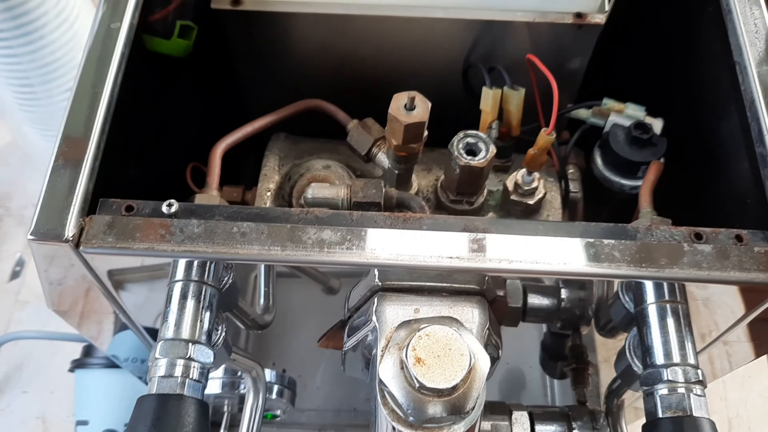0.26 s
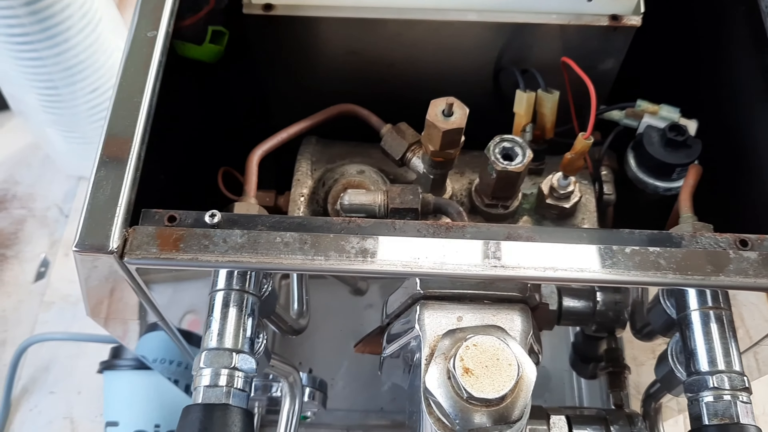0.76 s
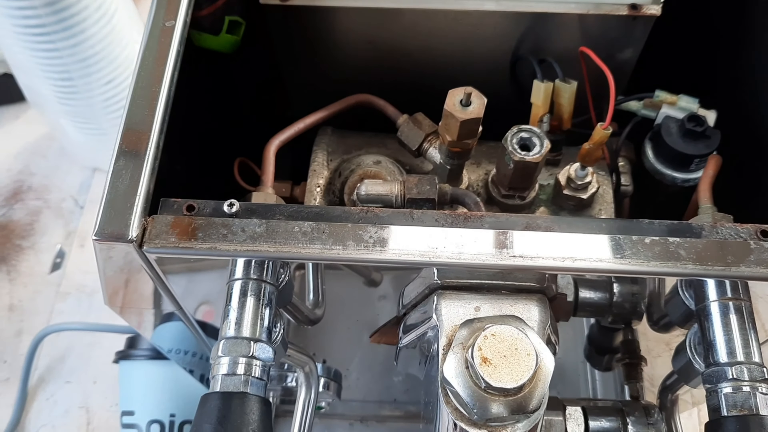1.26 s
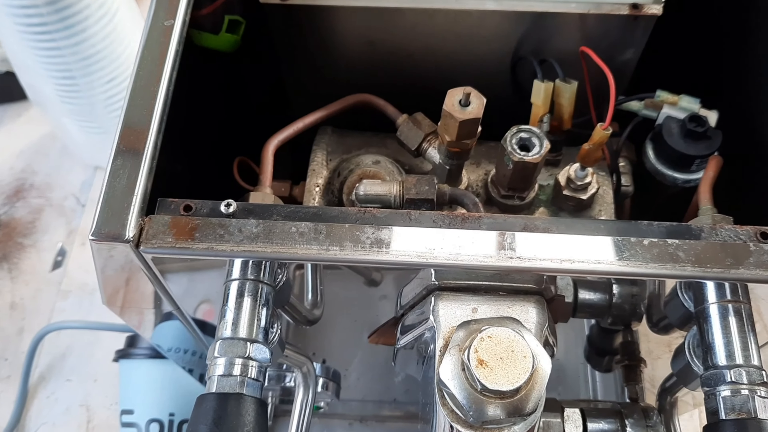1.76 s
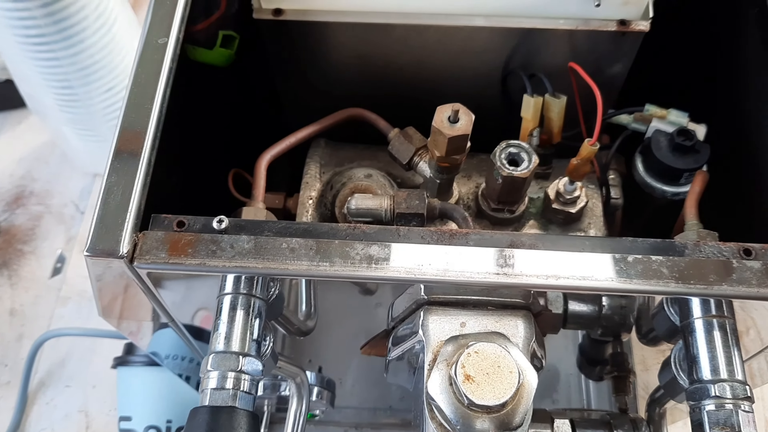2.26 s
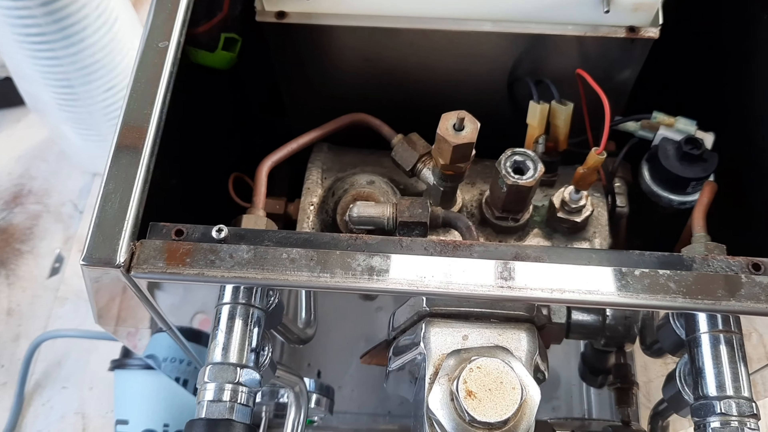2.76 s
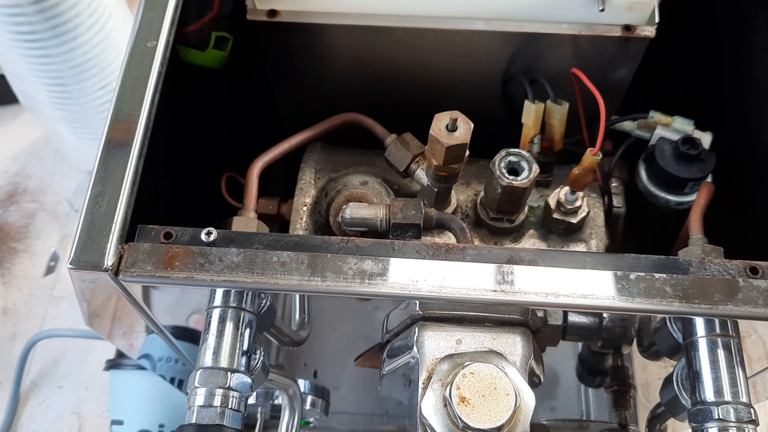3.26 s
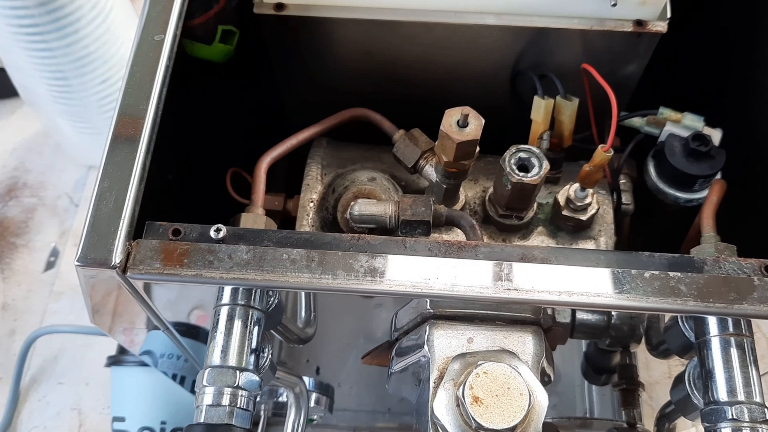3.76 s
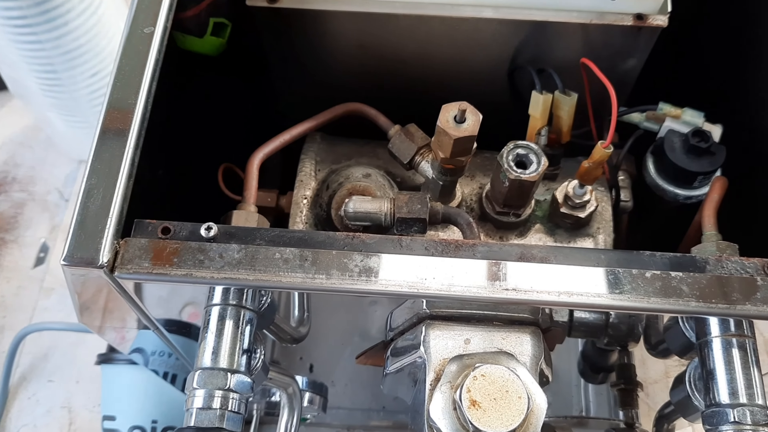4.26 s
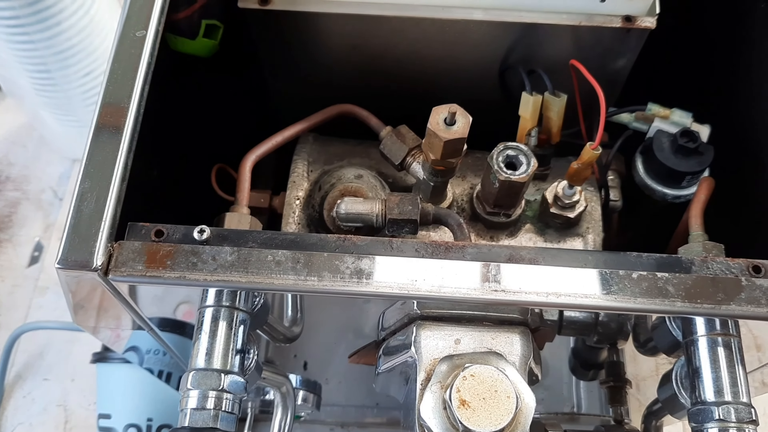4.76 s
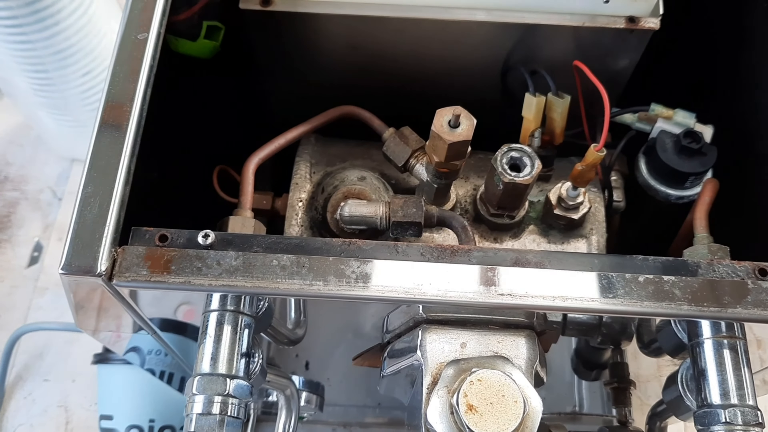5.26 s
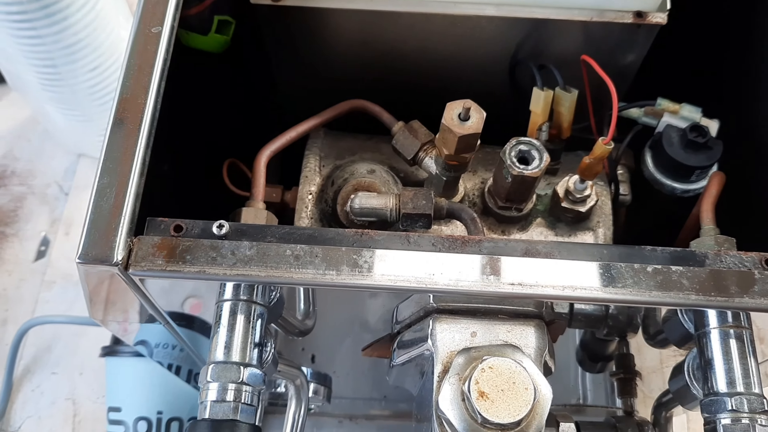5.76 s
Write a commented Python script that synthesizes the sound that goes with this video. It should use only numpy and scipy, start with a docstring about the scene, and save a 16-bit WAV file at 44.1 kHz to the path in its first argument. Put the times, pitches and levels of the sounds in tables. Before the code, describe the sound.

Close to a hand-held microphone, a boiler valve gives off a continuous, high hiss of escaping steam. In the first half second a distant door shuts, its few quick bounces blurring into one muffled knock. After that there is only the even hiss, with a quiet transformer hum and the soft rumble of a workshop behind it.

```python
"""Steam leak at a boiler valve

Close up, on a hand-held phone with two microphone ports, steam hisses through a valve in an open steel case.
Behind it are the low rumble of the workshop and a transformer humming at twice the mains frequency.
Early on, far off, a door shuts with a few dull bounces that the room smears together."""
import sys
import numpy as np
from scipy import signal
from scipy.fft import rfft, irfft
from scipy.io import wavfile
from scipy.ndimage import uniform_filter1d

SR = 44100
rng = np.random.default_rng(int(sys.argv[2]) if len(sys.argv) > 2 else 0)


def materialize(psi):
    """Save the field psi as 16-bit PCM at rate SR to the path in sys.argv[1].

    A 1-D psi becomes a single channel; in a 2-D psi each row is a channel.
    """
    bounded = np.clip(np.atleast_2d(psi).T, -1, 1)
    quanta = np.round(bounded * 32767).astype(np.int16)
    wavfile.write(sys.argv[1], SR, quanta)


N = 265471


def gain_of(db):
    """Decibels to amplitude gain."""
    return 10 ** (np.asarray(db) / 20)


def unit_rms(x):
    """Scales to rms 1."""
    return x / np.sqrt(np.mean(x ** 2) + 1e-20)


def curve_at(points, hz):
    """Interpolates a table on a log-frequency axis."""
    f, value = np.transpose(points)
    return np.interp(np.log(hz + 1), np.log(f + 1), value)


def wander(t, top_hz):
    """Slow random drift of rms 1: sines of random phase, the slower the larger."""
    rates = np.geomspace(top_hz / 20, top_hz, num=24)[:, None]
    sines = np.sin(2 * np.pi * (rates * t + rng.random(rates.shape)))
    return unit_rms((sines / np.sqrt(rates)).sum(0))


# Direct sound and case reflections, port against port: (frequency [Hz], coherence [0-1])
PORT_COHERENCE = [(60, .94), (170, .97), (350, .86), (860, .2), (1400, .56), (2100, .56), (2530, .35),
                  (2630, .1), (2720, .4), (2900, .1), (5600, .43), (6550, .1), (7600, .6), (8300, .36),
                  (9900, .2), (11650, .54), (12550, .1), (13250, .5), (13550, .3), (13900, .6),
                  (14650, .76), (15500, .15)]
# How far the left port leads the right: (frequency [Hz], phase [rad])
LEFT_LEAD = [(100, -.1), (860, -.8), (1300, .1), (2200, -.2), (2540, -2.3), (2680, 0), (3300, .1),
             (4000, -.7), (7400, -.4), (8800, -1.8), (9200, -.4), (11000, -.6), (12400, .3), (12800, -2.3),
             (13300, -3.3), (13700, -1.7), (15100, -2.2), (15600, -.5)]
# The hand swings the phone aside, drifts back and settles: (time [s], extra lag at the left port [s])
HAND_SWING = [(0, 3e-6), (.3, -8e-6), (.55, -5e-6), (.85, 21e-6), (2.1, 11e-6), (2.6, 14e-6), (3.1, 5e-6),
              (3.9, 5e-6), (4.2, -1e-6), (5.1, -5e-6), (5.4, 3e-6), (6.02, 5e-6)]
# Standing waves in the steel case, at the phone: (frequency [Hz], width [Hz], left [dB], right [dB])
CASE_RESONANCES = [(1190, 90, 3, 2), (1320, 60, -2, -3), (1425, 70, 3, 2), (1550, 90, -3, -4),
                   (1730, 130, 3, 1), (1930, 80, 0, 2), (2020, 60, -2, -3), (2220, 70, -2, -2),
                   (2400, 110, 2.5, 1), (2560, 70, -1.5, 0), (2720, 75, 5.5, 4.5), (2870, 90, -1, -2),
                   (3040, 70, 1, 3), (3130, 80, -1, -2), (3420, 80, -2, -2), (4350, 150, -1.5, 0),
                   (5750, 150, 1.5, 0), (5950, 200, 0, 3), (6380, 120, 0, 2), (7600, 350, 3.5, .5),
                   (8470, 200, 0, 2), (8800, 200, 0, -2.5), (11730, 300, 3.5, 1), (12600, 150, 2, 0),
                   (13120, 400, 4, 0), (13450, 250, -1, 2), (13750, 200, 0, -1.5), (14050, 150, 0, 1.5),
                   (14640, 150, 1, 1.5)]


def noise_at_ports(left, right, swing, patchy_db, swell_db, fft_size, ripple_db=1.2):
    """Stereo noise of rms 1, coloured by the steel case and partly shared by the two ports."""
    frames, hz = 4 * N // fft_size + 5, np.fft.rfftfreq(fft_size, 1 / SR)[:, None]
    t = np.arange(frames) * fft_size / 4 / SR
    re, im, other_re, other_im, patches = rng.standard_normal((frames, len(hz), 5)).T
    shared, other = re + 1j * im, other_re + 1j * other_im
    patches = unit_rms(uniform_filter1d(uniform_filter1d(patches, size=10, axis=0), size=16, axis=1))
    coherence = curve_at(PORT_COHERENCE, hz)
    lag_s = swing * np.interp(t, *np.transpose(HAND_SWING))
    shift = np.exp(-1j * (curve_at(LEFT_LEAD, hz) - 2 * np.pi * hz * lag_s))
    spectra = np.array([shared, shift * (coherence * shared + np.sqrt(1 - coherence ** 2) * other)])
    colour_db = np.array([curve_at(left, hz), curve_at(right, hz)])
    spectra *= gain_of(colour_db + patchy_db * patches + swell_db * wander(t, top_hz=12))
    for peak_hz, width, *db in CASE_RESONANCES:
        spectra *= gain_of(np.reshape(db, (2, 1, 1)) / (1 + (2 * (hz - peak_hz) / width) ** 2))
    # a faint, slowly drifting random ripple colours the noise at each port
    ripple = rng.standard_normal((frames, len(hz), 2)).T
    ripple = uniform_filter1d(ripple, size=SR // fft_size * 6, axis=2)
    ripple = uniform_filter1d(ripple, size=fft_size // 256, axis=1)
    spectra *= gain_of(ripple_db * unit_rms(ripple))
    return unit_rms(signal.istft(spectra, nperseg=fft_size, noverlap=3 * fft_size // 4)[1][:, :N])


# The jet close up at each port, coloured by case and phone body: (frequency [Hz], relative level [dB])
JET_AT_LEFT = [(900, -32), (2100, -21), (2700, -14), (3250, -16), (3900, -12.5), (5000, -14), (5800, -10.5),
               (7000, -10.5), (8300, -8.5), (9200, -15.5), (10400, -11.5), (11400, -7.5), (13600, -5),
               (14600, -.5), (15100, -2), (15500, -6.5), (15750, -6)]
JET_AT_RIGHT = [(900, -32), (2100, -21), (2550, -13), (3000, -16), (3700, -13.2), (5200, -11.7),
                (6800, -9.6), (8300, -8), (9200, -14.2), (10000, -15.2), (11600, -8.5), (13400, -3),
                (14600, -.8), (15300, -4.5), (15750, -4)]


def steam_jet(start_db=-27.5, rise_db_per_s=0.0651):
    """Turbulence at the valve: a dense, smooth hiss that grows as the boiler pressure creeps up."""
    hiss = noise_at_ports(JET_AT_LEFT, JET_AT_RIGHT, swing=1, patchy_db=1.0, swell_db=0.26, fft_size=1024)
    return gain_of(start_db + rise_db_per_s * np.arange(N) / SR) * hiss


# Workshop room tone, heard from beside the boiler: (frequency [Hz], relative level [dB])
ROOM_TONE = [(20, -28), (64, 0.5), (130, 0.5), (165, -2), (189, 1.5), (234, -10.5), (280, -7), (320, 1.5),
             (400, -8), (486, -12), (620, -10.5), (900, -16), (1300, -10.5), (2000, -15), (3000, -18.5)]


def workshop_rumble(level_db=-46.5):
    """Distant machines and air, lumpier than the jet."""
    rumble = noise_at_ports(ROOM_TONE, ROOM_TONE, swing=0, patchy_db=1.5, swell_db=0.1, fft_size=2048)
    return gain_of(level_db) * rumble


# The transformer at the phone, mean of both ports: (harmonic [number], rms level [dB])
HUM_HARMONICS = [(1, -43), (2, -62), (3, -63.5), (4, -67.5)]


def transformer_hum(hum_hz=100.02, waver_db=0.23):
    """Locked harmonics of twice the mains frequency, each wavering slightly in level."""
    t, out = np.arange(N) / SR, np.zeros((2, N))
    port_cycles, port_db = np.array([[-.04], [0]]), np.array([[-.3], [.3]])  # left is later and softer
    for harmonic, db in HUM_HARMONICS:
        waver = gain_of(waver_db * np.interp(t, t[::500], wander(t[::500], top_hz=1.97)))
        cycles = harmonic * hum_hz * t + rng.random() + port_cycles
        out += np.sqrt(2) * gain_of(db + port_db) * waver * np.sin(2 * np.pi * cycles)
    return out


# A door bouncing shut far across the workshop: (time [s], strength [dB], boost of the deep modes [dB])
DOOR_BOUNCES = [(0.136, -44.5, 17), (0.171, -38, 4), (0.200, -30, 7), (0.222, -25.5, 4), (0.253, -26, 3),
                (0.279, -35, 17.5), (0.302, -33.5, 11), (0.345, -36, 12), (.392, -38, 0)]
# Low modes of door and frame: (frequency [Hz], width [Hz], relative level [dB])
DOOR_MODES = [(58, 23, -13), (96.5, 25, 2.5), (153, 16.4, -2.5), (251, 12.5, -3.5), (278, 17, -4.5),
              (334.7, 15, 2), (395, 8.8, -5.5)]
# The dull wash where the door's modes merge: (frequency [Hz], relative level [dB])
WASH_SPECTRUM = [(30, -1), (200, 3), (400, 1), (520, -1), (640, 0.5), (900, -5), (1300, -11.5),
                 (2000, -12.5), (3000, -33)]


def distant_door(contact_s=0.0046, shudder_s=0.028, deep_below_hz=130, left_lag_s=150e-6):
    """Each bounce rings the low modes of door and frame and shakes out a short, dull wash."""
    t = np.arange(SR) / SR - np.array([[left_lag_s], [0]])
    out, shudder_power = np.zeros((2, SR)), np.zeros((2, SR))
    for onset_s, blow_db, deep_db in DOOR_BOUNCES:
        age = np.maximum(t - onset_s, 0)
        attack = gain_of(blow_db) * (1 - np.exp(-age / contact_s)) ** 2  # soft contact
        shudder_power += (attack * np.exp(-age / shudder_s)) ** 2
        for (hz, width, db), phase in zip(DOOR_MODES, rng.random(len(DOOR_MODES))):
            ring = np.exp(-np.pi * width * age) * np.sin(2 * np.pi * (hz * age + phase))
            out += gain_of(db + deep_db * (hz < deep_below_hz)) * attack * ring
    hz = np.fft.rfftfreq(SR, 1 / SR)
    right, other = rfft(rng.standard_normal((2, SR)))
    coherence = curve_at(PORT_COHERENCE, hz)
    left = coherence * right * np.exp(-2j * np.pi * hz * left_lag_s) + np.sqrt(1 - coherence ** 2) * other
    wash = irfft(np.array([left, right]) * gain_of(curve_at(WASH_SPECTRUM, hz)), SR)
    out += np.sqrt(shudder_power) * unit_rms(wash)
    return np.pad(out, ((0, 0), (0, N - SR)))


# The workshop's reverberation: (frequency [Hz], time to fall by 60 dB [s])
ROOM_T60 = [(60, .25), (130, .3), (250, .5), (1000, .7), (3000, .5)]


def workshop_reverb(x):
    """Sparse reflections, each band dying at its own speed; the bass is nearly alike at both ports."""
    taps = np.zeros((2, SR))
    arrivals = np.arange(200, SR - 20, 20) + rng.integers(0, 20, (2, (SR - 201) // 20))
    np.put_along_axis(taps, arrivals, rng.choice([-1., 1.], arrivals.shape), 1)
    hz, t, spectra = signal.stft(taps, SR, nperseg=1024)
    coherence = curve_at(PORT_COHERENCE, hz)[:, None]
    spectra[1] = coherence * spectra[0] + np.sqrt(1 - coherence ** 2) * spectra[1]
    decay = gain_of(-60 * t / curve_at(ROOM_T60, hz)[:, None])
    tail = signal.istft(spectra * decay, SR, nperseg=1024)[1]
    return signal.fftconvolve(x, tail / np.linalg.norm(tail[0]), axes=1)[:, :N]


def scene(reverb_db=-5):
    """Steam up close, rumble and hum behind it, and the far door both direct and through the room."""
    door = distant_door()
    steady = steam_jet() + workshop_rumble() + transformer_hum()
    return steady + door + gain_of(reverb_db) * workshop_reverb(door)


def record(dry):
    """The phone cuts off the highest treble steeply."""
    lowpass = signal.firwin(1501, cutoff=15740, window=("kaiser", 9), fs=SR)
    return signal.oaconvolve(dry, lowpass[None], "same")


dry = scene()
out = record(dry)
materialize(out)
```